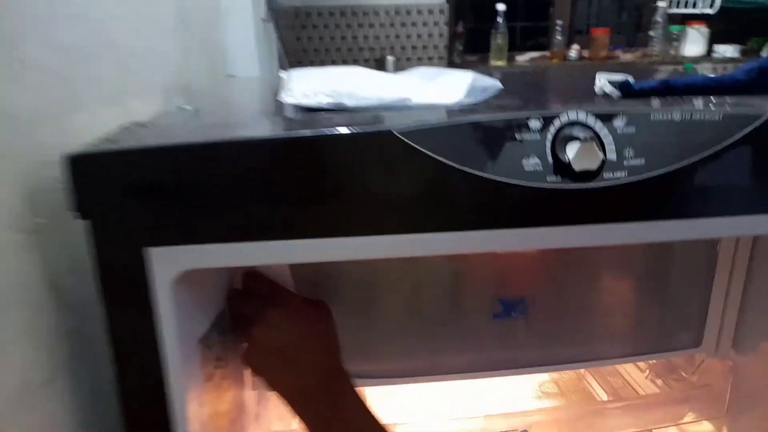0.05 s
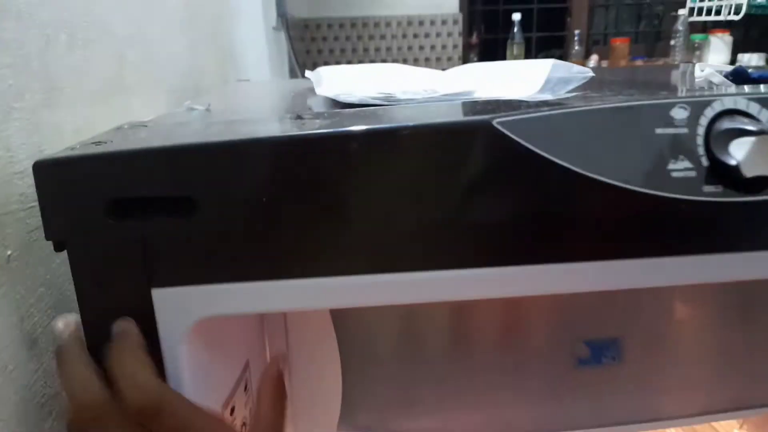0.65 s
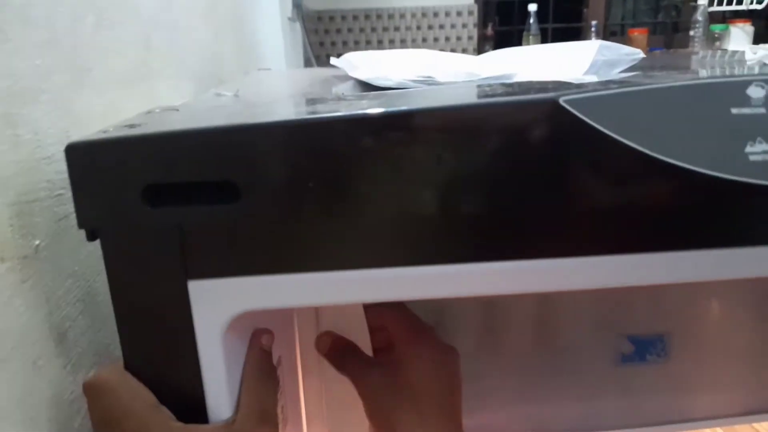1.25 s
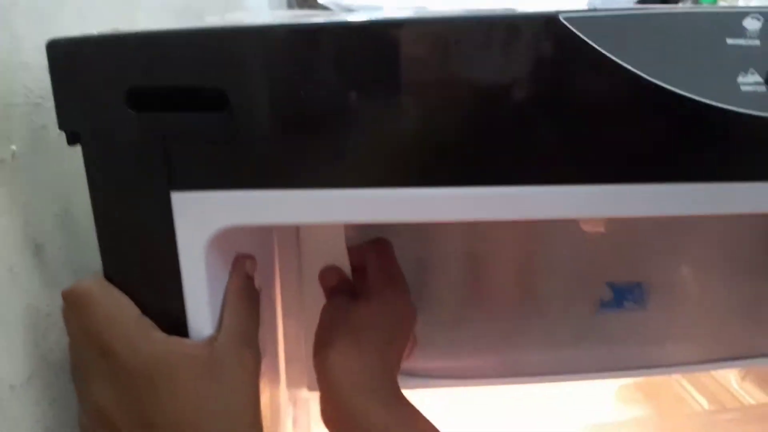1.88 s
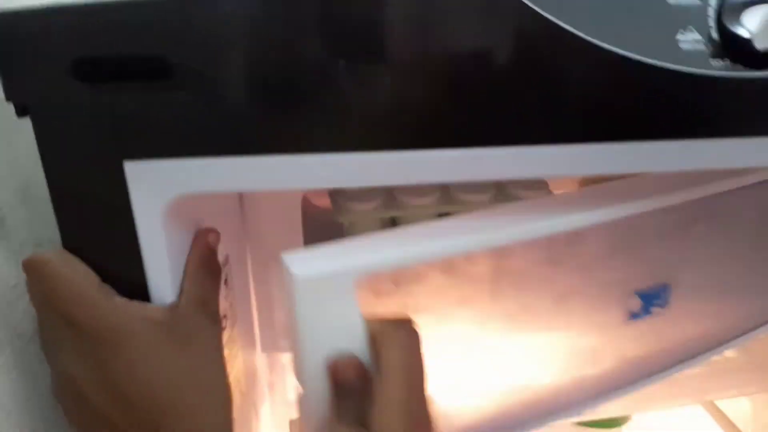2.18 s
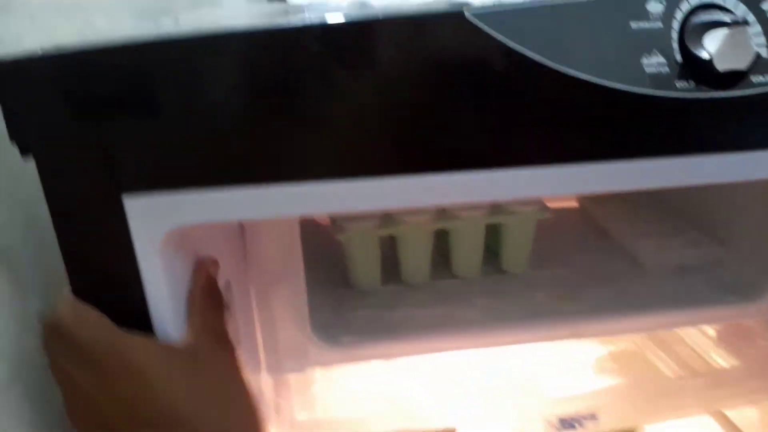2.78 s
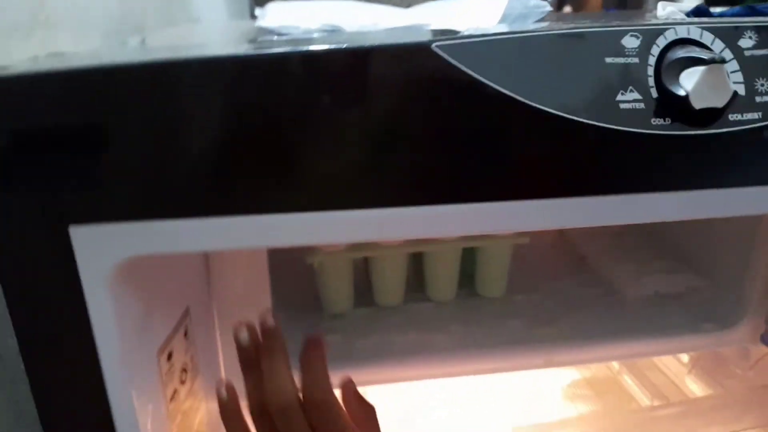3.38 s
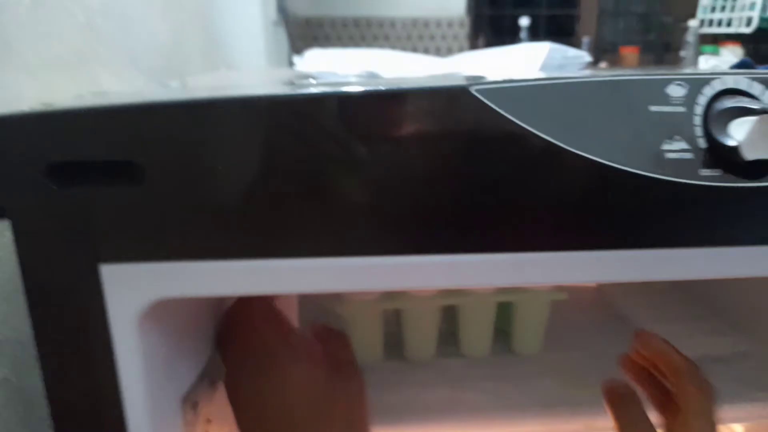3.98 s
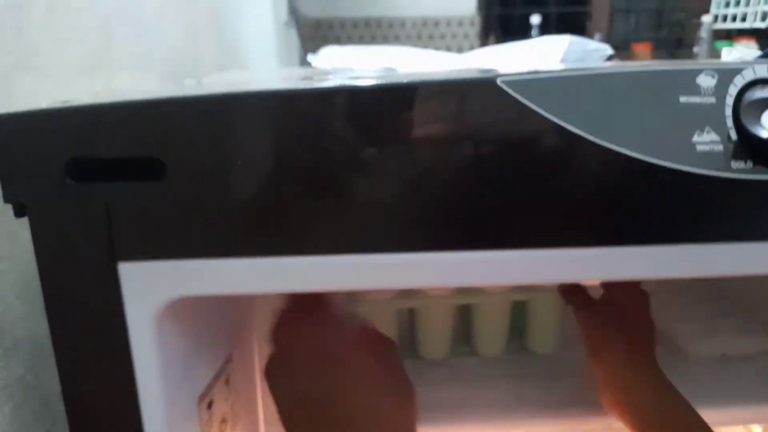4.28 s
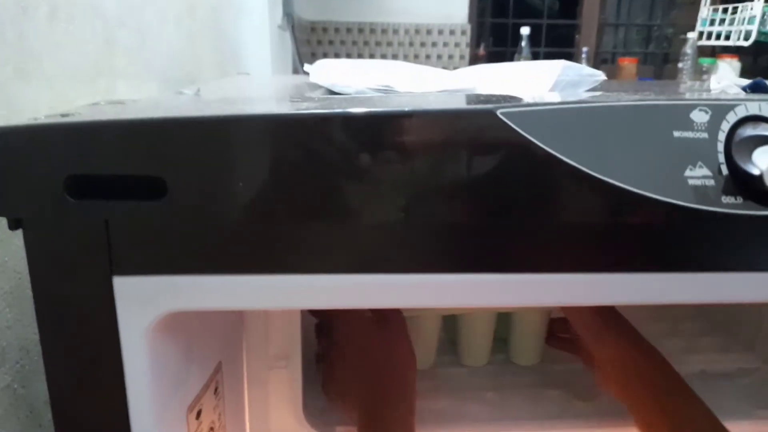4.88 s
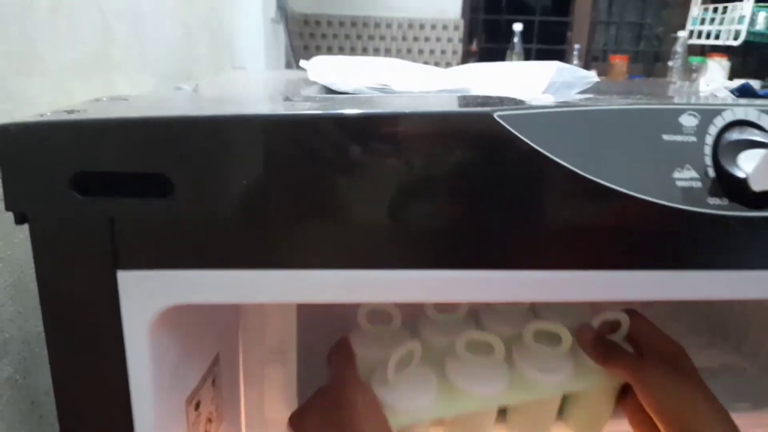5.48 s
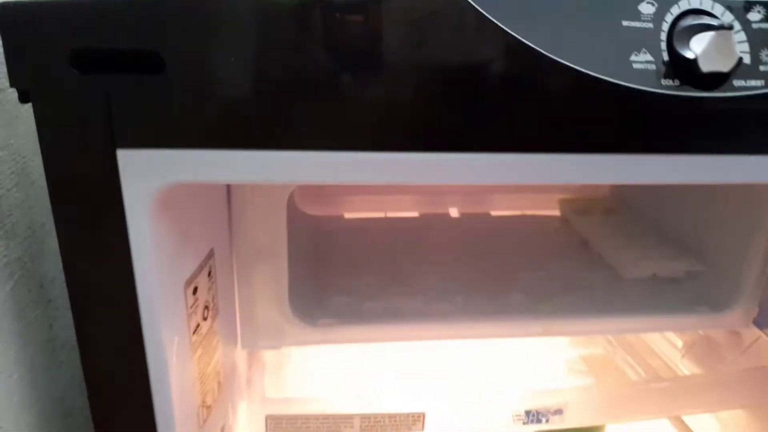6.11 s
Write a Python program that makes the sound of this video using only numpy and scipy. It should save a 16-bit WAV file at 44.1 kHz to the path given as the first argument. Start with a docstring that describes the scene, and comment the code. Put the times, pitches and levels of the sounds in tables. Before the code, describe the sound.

A fridge compressor hums quietly while a plastic freezer door creaks and ticks under pushing fingers. It breaks free with one loud, ringing snap that briefly ducks the background, and knocks twice against its stop a second later. Then a lolly mould rasps across the icy shelf in a quick clatter of hollow knocks. A close stereo microphone picks up the short echo of a small kitchen.

```python
"""Ice lollies from the freezer box

Close up at a fridge in a small, hard-walled kitchen, on a narrowly spaced stereo microphone. Fingers
strain at the freezer box's plastic flap: it snaps off its catch and bumps its stop. A lolly mould is
dragged over the frosty shelf, juddering and knocking, and lifted out. The compressor hums underneath.
The loud snap makes the gain control duck everything for a second or two."""
import sys
import numpy as np
from scipy import signal
from scipy.fft import rfft, irfft, next_fast_len
from scipy.io import wavfile
from scipy.ndimage import uniform_filter1d, minimum_filter1d

SR = 44100
rng = np.random.default_rng(int(sys.argv[2]) if len(sys.argv) > 2 else 0)


def dump(signal):
    """Clip the signal to [-1, 1] and save it as 16-bit WAV at the path in sys.argv[1]."""
    limited = np.clip(np.atleast_2d(signal).T, -1, 1)
    pcm = np.round(limited * 32767).astype(np.int16)
    wavfile.write(sys.argv[1], SR, pcm)


N = 275625
TIME = np.arange(N) / SR


def freezer_flap(thump_hz=190):
    """The flap snaps free, then hits its stop and rebounds; each blow rings flap and cabinet."""
    # Blows at the catch, then at the stop. Each row: start in seconds, strength in dB,
    # hardness (crack over thump) in dB, contact time in ms.
    flap_knocks = [(.342, -43.5, 6, 8.6), (.983, -30, 0.5, 3.4), (1.092, -29.5, -14.5, 0.26),
                   (1.394, -27.5, -26, 1.4), (1.409, -32.5, 0, 0.13), (1.47, -47.5, 11.5, 0.66),
                   (1.624, -44, 5, .5), (1.9727, -3, 10.5, 0.76), (1.999, -3, 2.5, 9),
                   (2.862, -39.5, -3.5, .4), (3.657, -41, 5.5, 2.6)]
    stop_knocks = [(3.1186, -6, 1.5, .6), (3.264, -14.5, -4.5, 1)]
    # Modes of flap and cabinet, then of hinge and stop. Each row: pitch in Hz, gain in dB, t60 in seconds.
    flap_modes = [(76, 3.5, 0.3), (96, 0, 0.29), (118.06, -3.5, .3), (158.1, 5, 0.32), (233.8, 5.5, 0.84),
                  (280, -9, 0.41), (372.6, 3, 0.23), (416, -0.5, 0.05), (519.7, 0, 0.22), (643, 4, 0.39),
                  (847, -7, 0.12), (1470, -3, .08), (1930, -2, 0.034), (2400, -2.5, 0.047), (4150, -7, .06)]
    stop_modes = [(257, -6, 0.31), (383, 4, 0.15), (831, 6, 0.22), (1630, 6.5, 0.016), (2450, -7, 0.018)]
    blows = knocks(flap_knocks, thump_hz, thump_db=-3, body_db=-6, crack_db=-6, fizz_db=-8,
                   body_share=0.42, t60=0.061, thump_decay=1.5, fizz_decay=0.75,
                   soft_hz=7960, crack_hz=2870, octaves_per_db=0)
    stop = knocks(stop_knocks, thump_hz, thump_db=-5, body_db=-5, crack_db=-8, fizz_db=-13,
                  body_share=0.39, t60=0.047, thump_decay=1.7, fizz_decay=0.64,
                  soft_hz=8000, crack_hz=2670, octaves_per_db=0.12)
    stop = ring(stop, stop_modes, direct_db=0.5)
    shaking = blows + stop + cabinet_thuds(flap_knocks + stop_knocks) + finger_strain()
    return ring(shaking, flap_modes, direct_db=-1.5) + catch_ticks() * amp(-1.5)


def lolly_mould(lift_s=5.1, fade_db_per_s=120):
    """The mould judders with the pull and knocks about; its rasp dies as it leaves the frosty shelf."""
    # Knocks and skids on shelf and walls. Each row: start in seconds, strength in dB, hardness in dB,
    # contact time in ms.
    mould_knocks = [(4.494, -30, -6.5, 8), (4.513, -17, -27.5, 7.4), (4.948, -25.5, 0.5, 2.09),
                    (4.9686, -14.5, -2.5, 0.19), (4.979, -11, -9, 1.7), (5.0054, -22, 7, .72),
                    (5.017, -13, 1.5, 0.23), (5.040, -17, 0.5, 1.1), (5.132, -15, 1.5, 0.85),
                    (5.190, -21, -5.5, 0.33), (5.242, -18, -0.5, 8.8), (5.300, -14.5, -6.5, 5.1),
                    (5.342, -9, -1.5, 16.3), (5.366, -15, 1.5, 2.5), (5.379, -17.5, 8, 1.3),
                    (5.442, -10, -0.5, 7.2), (5.578, -15.5, -4.5, 7.5)]
    # Modes of the filled mould in the box. Each row: pitch in Hz, gain in dB, t60 in seconds.
    mould_modes = [(80, -19, 0.41), (162.7, 1, 0.6), (230, -3, 0.18), (260.8, 3.5, 0.21), (299, 7, 0.22),
                   (375.8, 6, 0.56), (523, 10, 0.28), (579.3, 5, 0.29), (738, 0, 0.1), (850, -10, 0.6),
                   (957, 2, 0.18), (1160, -11, 0.95), (1740, -1.5, 0.0058), (2110, 5.5, 0.02),
                   (6900, 1, 0.004)]
    # The pull of the hands. Each row: time in seconds, relative force in dB.
    drag = [(4.48, -44.5), (4.72, -64.5), (4.87, -45.5), (4.98, -25.5), (5.09, -21), (5.17, -28.5),
            (5.47, -22.5), (5.66, -40.5), (5.81, -34), (5.95, -66)]
    blows = knocks(mould_knocks, thump_hz=199.3, thump_db=-6, body_db=-3, crack_db=-7, fizz_db=-7.5,
                   body_share=0.45, t60=0.072, thump_decay=1.49, fizz_decay=0.56,
                   soft_hz=3700, crack_hz=3080, octaves_per_db=0.25)
    pull = gain_curve(drag)
    on_shelf = amp(-fade_db_per_s * np.maximum(TIME - lift_s, 0))
    scrape = stick_slip(friction=pull ** 0.75 * on_shelf * amp(-15.5), judder=pull * amp(-5),
                        slips_per_s=400, spread_db=4, grain_s=0.011, lead_ms=-0.233)
    return ring(blows + scrape, mould_modes, direct_db=0.5)


def cabinet_thuds(flap_blows, lag_s=0.01, contact_ms=1.7):
    """The cabinet answers each blow on the flap with a lower, duller thud, and is bumped itself."""
    # Hands and mould against the cabinet. Each row: start in seconds, strength in dB, hardness in dB,
    # contact time in ms.
    bumps = [(.995, -21, -37, 5), (1.085, -28.5, -27, 1.7), (1.402, -23, -22.5, 2.2),
             (1.601, -37.5, -19, 5), (5.453, -15.5, -27, 2.6), (5.498, -19, -34, 2.3),
             (5.77, -38, -25, 5.7)]
    answers = [(s + lag_s, db - 3.5, hardness - 7.5, contact_ms) for s, db, hardness, _ in flap_blows]
    return knocks(answers + bumps, thump_hz=101, thump_db=-6, body_db=-6.5, crack_db=-9.5, fizz_db=-7,
                  body_share=0.089, t60=0.042, thump_decay=1.66, fizz_decay=0.61,
                  soft_hz=7840, crack_hz=3000, octaves_per_db=-0.33)


def finger_strain():
    """Fingers stick and slip as they push at the flap."""
    # Each row is one push: time of greatest force in seconds, relative force in dB.
    pushes = [(.8, -57.5), (1.02, -33.5), (1.32, -38.5), (1.43, -34.5), (1.62, -45.5)]
    # Soft fingertips pass on mostly the lows. Each row: frequency in Hz, gain in dB.
    fingertips = [(100, 4.5), (300, -4.5), (700, -5), (2000, 1.5)]
    force = strokes(pushes, rise_db_per_s=448, fall_db_per_s=128)
    creak = stick_slip(friction=force * amp(-30.5), judder=force * amp(-7.5),
                       slips_per_s=390, spread_db=3, grain_s=0.002, lead_ms=0.05)
    return colour(creak, fingertips)


def catch_ticks(click_db=-7, click_s=0.006):
    """The plastic catch ticks under strain: a short click and a small pitched ring."""
    # Each row is one tick: start in seconds, relative level in dB.
    ticks = [(1.054, -31), (1.244, -41.5), (1.474, -46)]
    # Modes of the catch. Each row: pitch in Hz, relative level in dB, t60 in seconds.
    modes = [(706, -6, 0.035), (1518, -2, .035), (2050, -7, 0.023), (3250, -10, .015)]
    out, t = np.zeros((2, N)), np.arange(8192) / SR
    tone = sum(amp(db - 60 * t / t60) * np.sin(2 * np.pi * hz * t) for hz, db, t60 in modes)
    for start, db in ticks:
        click = amp(click_db) * np.exp(-t / click_s) * rng.standard_normal((2, len(t)))
        add(out, start, amp(db) * (tone + click))
    return out


def hand_brush(grain_db=1.5):
    """A hand sliding over the smooth liner hisses faintly."""
    # Each row is one stroke: time of greatest speed in seconds, relative level in dB.
    brushes = [(.29, -59.5), (3.91, -52)]
    # Spectrum of skin on the liner. Each row: frequency in Hz, relative level in dB.
    spectrum = [(300, -20), (900, 2), (1400, -3), (2400, 2.5), (3500, -4), (5000, -2), (9000, 3),
                (13500, 7), (16000, 1)]
    speed = strokes(brushes, rise_db_per_s=117, fall_db_per_s=127)
    hiss = unit_rms(colour(rng.standard_normal((2, N)), spectrum))
    return hiss * speed * amp(grain_db * drift(70))


def knocks(rows, thump_hz, thump_db, body_db, crack_db, fizz_db, body_share, t60,
           thump_decay, fizz_decay, soft_hz, crack_hz, octaves_per_db):
    """Blows shake a panel in four bands: thump, body, crack, fizz. A long contact lingers like a skid."""
    # Where the hands work, from the catch at left to the hinge at right.
    # Each row: time in seconds, lead of the left channel in ms.
    bearing = [(1, 0.12), (2, 0.14), (3.1, -0.46), (4.5, -0.008), (5.1, -0.273), (5.6, -0.16)]
    out, t = np.zeros((2, N)), np.arange(8192) / SR
    band_t60s = t60 * np.array([thump_decay, np.sqrt(thump_decay), 1, fizz_decay])
    soft_pole = np.exp(-2 * np.pi * soft_hz / SR)  # soft plastic dulls the blow
    for start, strength, hardness, contact_ms in rows:
        pitch = min(crack_hz * 2 ** (octaves_per_db * hardness), SR / 6)
        bands = [(thump_hz / 1.45, thump_hz * 1.35), (thump_hz * 2, thump_hz * 5.5),
                 (pitch / 2.3, pitch * 2.3), (9000, 17000)]
        contact_s = contact_ms / 1000
        fizz_lift = hardness - 9 * np.log10(contact_ms)  # a longer contact has less fizz
        levels = [thump_db, body_db + body_share * hardness, crack_db + hardness, fizz_db + fizz_lift]
        attack = 1 - np.exp(-t / contact_s)
        blow = np.zeros((2, len(t)))
        for band, db, band_t60 in zip(bands, levels, band_t60s):
            swell = attack * np.exp(-t / (band_t60 / np.log(1000) + contact_s))
            band_pass = signal.butter(2, band, "bandpass", fs=SR, output="sos")
            shake = signal.sosfilt(band_pass, panel_burst(swell))
            shake = signal.lfilter([1], [1, -soft_pole], shake)
            blow += amp(strength + db) * unit_rms(shake) * np.sqrt(np.mean(swell ** 2))
        add(out, start, place(blow, np.interp(start, *np.transpose(bearing))))
    return out


def panel_burst(swell, likeness=0.44, evenness=0.39):
    """Crowded modes of fairly even strength: a noise burst, partly alike in the two channels."""
    shared, *own = rng.standard_normal((3, len(swell)))
    noise = np.sqrt(likeness) * shared + np.sqrt(1 - likeness) * np.array(own)
    spectrum = rfft(noise * swell, 2 * len(swell))
    flattened = irfft(spectrum / abs(spectrum) ** evenness)[:, :len(swell)]
    return flattened * swell ** (1 / 8)


def stick_slip(friction, judder, slips_per_s, spread_db, grain_s, lead_ms):
    """Uneven slips under the hand: each gives a small rasping burst and a low shove."""
    # Spectra of the rasp and of the shove. Each row: frequency in Hz, relative level in dB.
    rasp_spectrum = [(150, -21), (400, -2), (900, 3), (1300, -6.5), (2200, -9), (4000, -17.5), (7000, -14),
                     (16000, -22.5)]
    shove_spectrum = [(25, -30.5), (45, -30.5), (75, -4), (170, 0), (280, -10.5), (450, -6), (1000, -45.5),
                      (3000, -80)]
    slipping = rng.random(N) < slips_per_s / SR
    slips = slipping * amp(spread_db * np.minimum(rng.exponential(1, N), 3))
    bursts = signal.lfilter([1], [1, -np.exp(-1 / (grain_s * SR))], slips)
    rasp = unit_rms(colour(bursts * rng.standard_normal(N), rasp_spectrum))
    shove = unit_rms(colour(slips * rng.choice([-1, 1], N), shove_spectrum))
    return place(friction * rasp + judder * shove, lead_ms)


def ring(x, modes, direct_db):
    """The struck object rings on at its own modes."""
    out = amp(direct_db) * x
    for hz, db, t60 in modes:
        radius = np.exp(-np.log(1000) / (t60 * SR))
        feedback = [1, -2 * radius * np.cos(2 * np.pi * hz / SR), radius ** 2]
        out += amp(db) * (1 - radius) * signal.lfilter([1, 0, -1], feedback, x)
    return out


def kitchen_reverb(x, gap_s=0.0026, build_s=0.0017):
    """Dense reflections off hard walls die band by band; three tails crossfade as things move."""
    # Decay of the room. Each row: frequency in Hz, t60 in seconds.
    decay = [(70, 1), (200, 0.72), (700, 0.65), (2500, .66), (6000, 0.7), (11000, 0.62), (16000, 0.44)]
    # Strength of the reflections. Each row: frequency in Hz, relative level in dB.
    reflections = [(60, 2.5), (250, 2), (1000, 0.5), (3000, -3), (6500, -6), (9000, -4), (16000, -4.5)]
    out = np.zeros((2, N))
    build_up = np.clip((TIME[:SR] - gap_s) / build_s, 0, 1)
    for k in range(3):
        hz, t, bands = signal.stft(rng.choice([-1., 1.], (2, SR)), SR, nperseg=256)
        t60 = at_hz(decay, hz)[:, None]
        bands *= amp(at_hz(reflections, hz)[:, None] - 60 * t / t60)
        bands *= np.sqrt(2 * np.log(1000) / (t60 * SR))  # same energy however long the decay
        tail = signal.istft(bands, SR, nperseg=256)[1][:, :SR] * build_up
        share = np.sqrt(2 / 3) * np.cos(2 * np.pi * (TIME + k / 3))
        out += signal.fftconvolve(x * share, tail, axes=1)[:, :N]
    return out


def compressor(waver_db=3):
    """The motor hums in steady tones that waver in level and phase."""
    # Each row is one motor tone: frequency in Hz, relative level in dB.
    tones = [(99, -51), (124, -69.5), (232, -62.5), (296, -64), (346, -65.5), (389, -67.5), (630, -68)]
    hum = np.zeros(N)
    for hz, db in tones:
        hum += amp(db + waver_db * drift(2.9)) * np.sin(2 * np.pi * hz * TIME + drift(9.9))
    return np.sqrt(2) * hum


def room_tone(flutter_db=2.15):
    """Soft noise of the kitchen, dipping briefly as the hands reach in."""
    # Spectrum of the noise. Each row: frequency in Hz, relative level in dB.
    spectrum = [(25, -35.5), (50, -16), (80, -7), (135, -10.5), (200, -12.5), (400, -16.5), (620, -20),
                (800, -26.5), (1400, -29), (1750, -30.5), (2030, -25), (2300, -34), (2700, -37.5),
                (6000, -39.5), (7300, -32.5), (16000, -39)]
    # Its rise and fall. Each row: time in seconds, relative level in dB.
    levels = [(-.05, -48.5), (.9, -52.5), (3.9, -49), (4.15, -54.5), (4.35, -53), (4.8, -47.5),
              (6.3, -50.5)]
    noise = unit_rms(colour(rng.standard_normal((2, N)), spectrum))
    return noise * gain_curve(levels) * amp(flutter_db * drift(4.9))


def gain_control(x, ceiling_db=-9.5, hold_s=0.94, recovery_db_per_s=5.5):
    """Turns down at once when the power passes the ceiling, holds, then recovers slowly."""
    power = uniform_filter1d((x ** 2).mean(0), size=220)
    power_db = 10 * np.log10(abs(power) + 1e-12)
    needed_db = np.minimum(ceiling_db - power_db, 0)
    half = round(hold_s * SR / 2)
    held_cut_db = -minimum_filter1d(needed_db, 2 * half + 1, origin=half, mode="nearest")
    recovery = recovery_db_per_s * TIME
    cut_db = np.maximum.accumulate(held_cut_db + recovery) - recovery
    return x * amp(-uniform_filter1d(cut_db, size=64))


def overload(x, full_scale=0.94, knee=6):
    """Rounds off the few peaks that reach full scale."""
    return x / (1 + abs(x / full_scale) ** knee) ** (1 / knee)


def amp(db):
    """Decibels to gain."""
    return 10 ** (np.asarray(db) / 20)


def unit_rms(x):
    """Scales to rms 1."""
    return x / np.sqrt(np.mean(x ** 2) + 1e-20)


def at_hz(points, hz):
    """Reads a table along a log-frequency axis."""
    frequencies, values = np.transpose(points)
    return np.interp(np.log(hz + 1), np.log(frequencies), values)


def gain_curve(rows):
    """Gain over time through points of seconds and dB; silent outside them."""
    return amp(np.interp(TIME, *np.transpose(rows), left=-np.inf, right=-np.inf))


def strokes(rows, rise_db_per_s, fall_db_per_s):
    """Gain over time of hand movements that each swell to a peak and ease off."""
    return sum(amp(db - np.maximum((s - TIME) * rise_db_per_s, (TIME - s) * fall_db_per_s))
               for s, db in rows)


def drift(rate_hz, size=4096):
    """Smooth random wander of rms 1."""
    hz = np.fft.rfftfreq(size, TIME[-1] / size)
    slow = irfft(rfft(rng.standard_normal(size)) * np.exp(-(hz / rate_hz) ** 2))
    return np.interp(TIME, np.linspace(0, TIME[-1], size), unit_rms(slow))


def colour(x, points, depth=1):
    """Minimum-phase filter with the given dB shape, scaled by depth."""
    hz = abs(np.fft.fftfreq(4096, 1 / SR))
    log_gain = depth * np.log(amp(at_hz(points, hz)))
    taps = np.fft.ifft(np.exp(np.conj(signal.hilbert(log_gain)))).real
    return signal.oaconvolve(x, taps if x.ndim == 1 else taps[None], axes=-1)[..., :x.shape[-1]]


def place(x, lead_ms):
    """A sound reaches the left channel lead_ms ahead of the right."""
    size = next_fast_len(x.shape[-1] + 256)
    shift = np.exp(1j * np.pi * np.fft.rfftfreq(size, 1000 / SR) * lead_ms)
    return irfft(rfft(x, size) * np.array([shift, shift.conj()]), size)[:, :x.shape[-1]]


def add(mix, start_s, sound):
    """Mixes a sound in at start_s."""
    part = mix[:, round(start_s * SR):][:, :sound.shape[1]]
    part += sound[:, :part.shape[1]]


def scene():
    """Flap and mould up close, the kitchen behind; half shut in the box, the mould stirs the room less."""
    flap, mould = freezer_flap(), lolly_mould()
    room = kitchen_reverb(amp(-1) * flap + amp(-6) * mould)
    background = compressor() * amp(-2) + room_tone() * amp(2)
    return flap + mould + hand_brush() * amp(8) + room + background


def record(dry, band_limit_hz=16100):
    """Two closely spaced microphone ports, then gain control, overload and the band limit."""
    # Stereo width, nearly mono in the upper bass. Each row: frequency in Hz, side gain in dB.
    width = [(30, 3), (70, -11), (150, -19.5), (300, -9), (600, -0.5), (1200, -0.5), (16000, 0.5)]
    # Mismatch of the ports. Each row: frequency in Hz, tilt in dB that each port takes at its own depth.
    balance = [(60, -1.5), (300, -1), (650, -3.5), (1300, -0.5), (5000, -2), (9000, -2), (14000, -1.5)]
    # Microphone response, notched in the treble. Each row: frequency in Hz, gain in dB.
    response = [(30, 3), (1000, -1.5), (5500, 0), (7250, 0), (7750, -9), (9500, -8.5), (13500, -4.5),
                (16000, -3.5)]
    mid = dry.mean(0)
    side = colour((dry[0] - dry[1]) / 2, width)
    left = colour(mid + side, balance, depth=0.35)
    right = colour(mid - side, balance, depth=-0.85)
    picked_up = colour(np.array([left, right]), response)
    limited = overload(gain_control(picked_up))
    low_pass = signal.firwin(255, band_limit_hz, window=("kaiser", 8), fs=SR)
    return signal.oaconvolve(limited, low_pass[None], "same")


dry = scene()
out = record(dry)
dump(out)
```